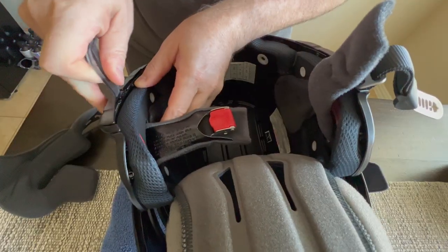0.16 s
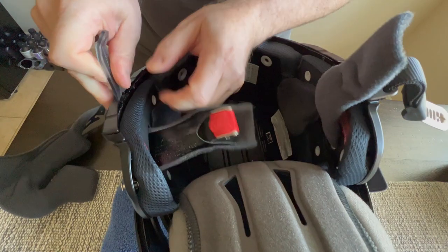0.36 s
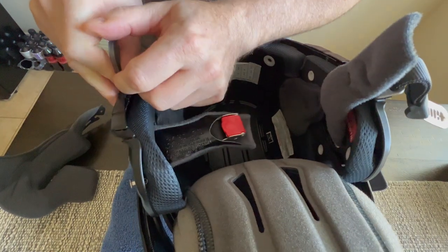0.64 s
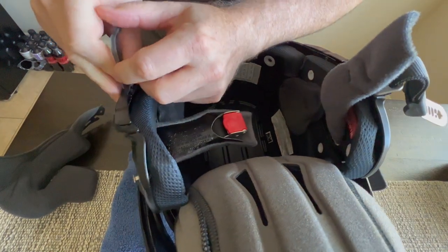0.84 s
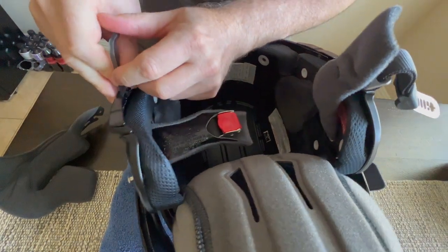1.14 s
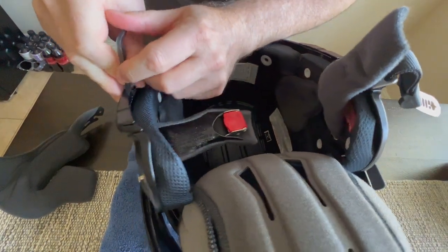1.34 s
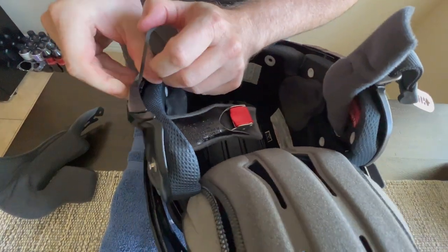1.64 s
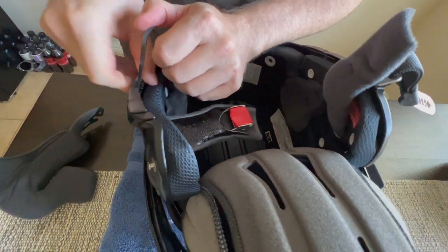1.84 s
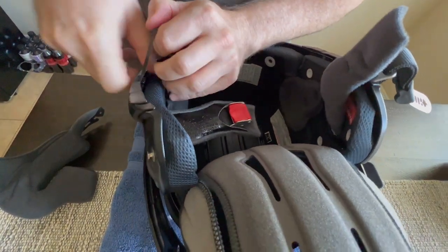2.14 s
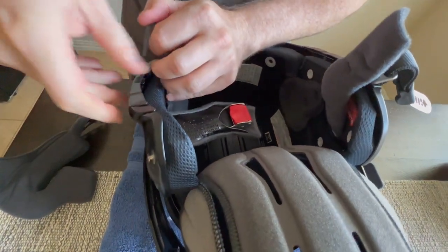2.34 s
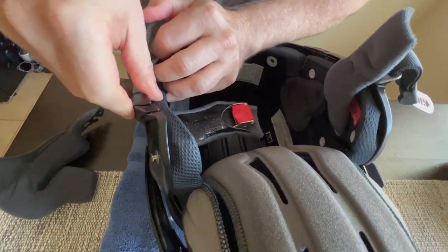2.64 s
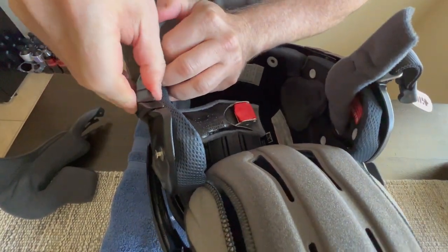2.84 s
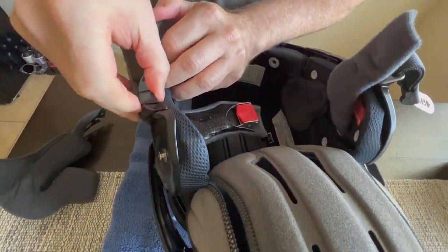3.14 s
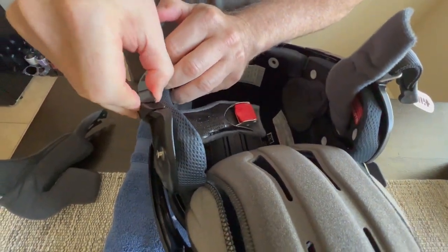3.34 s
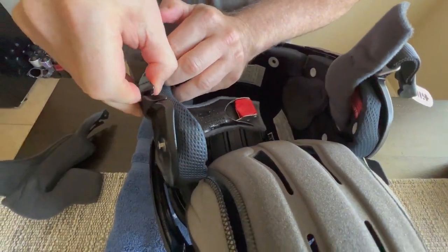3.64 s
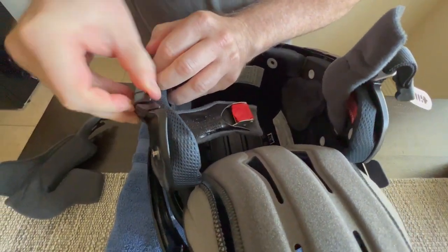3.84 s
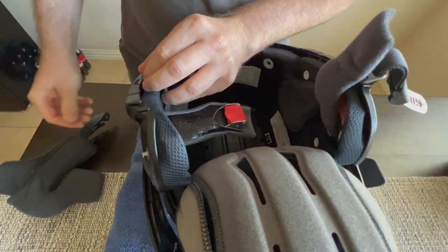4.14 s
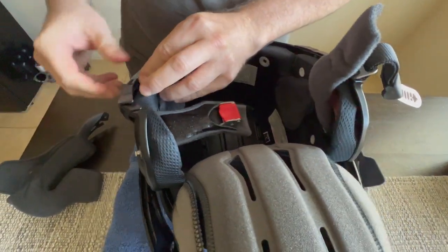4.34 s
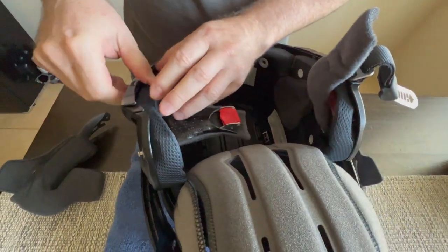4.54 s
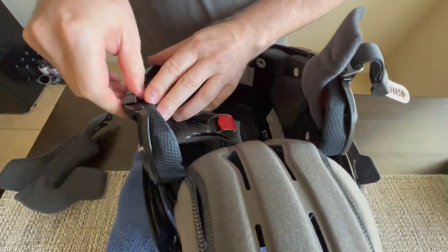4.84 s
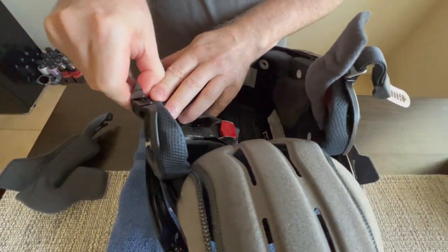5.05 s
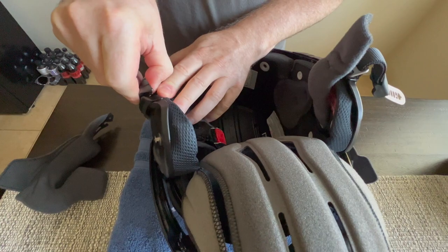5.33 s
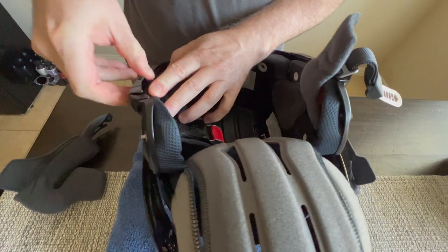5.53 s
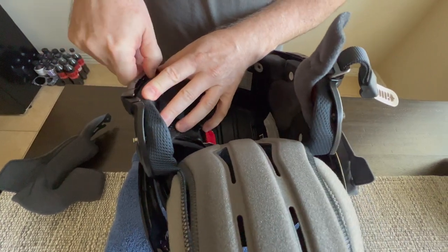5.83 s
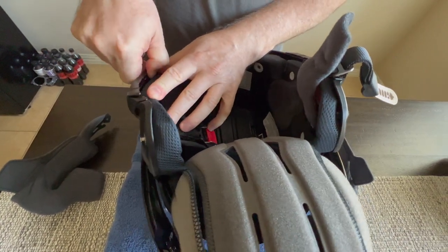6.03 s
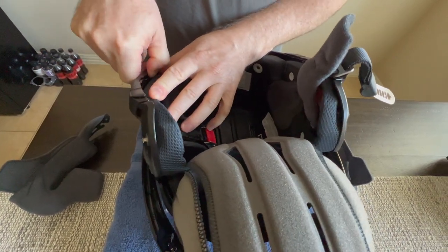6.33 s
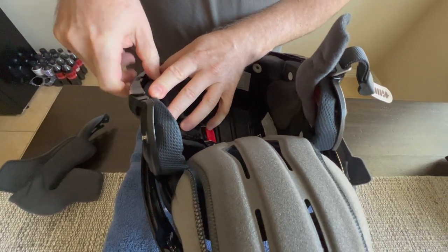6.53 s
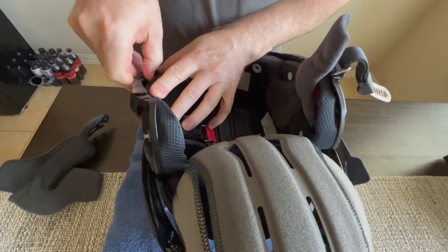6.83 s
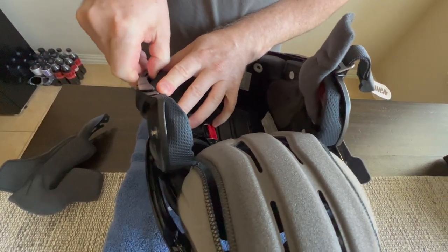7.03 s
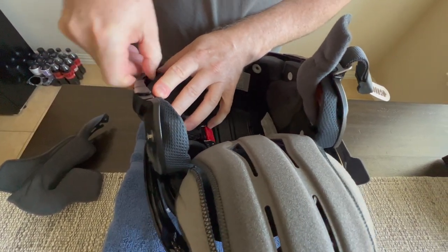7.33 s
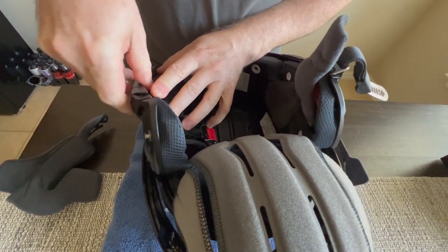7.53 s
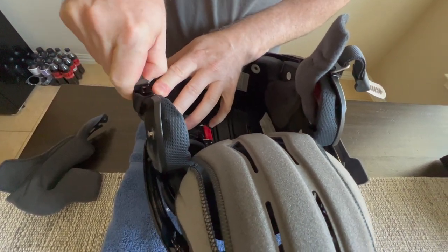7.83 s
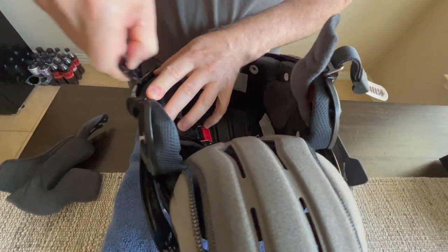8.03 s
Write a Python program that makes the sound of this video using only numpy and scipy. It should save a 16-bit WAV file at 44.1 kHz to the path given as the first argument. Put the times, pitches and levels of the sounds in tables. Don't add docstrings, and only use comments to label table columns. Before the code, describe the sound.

Close stereo pickup at a table indoors: faint padding rustle and light plastic taps, a small metal tinkle near the start, grainy rubbing. Midway the tool lets go with a hard bright snap and a run of clacks, skids and short scrapes. It calms to light clicks and rubs, before several strong, lower snaps knock the hollow shell at the end. Soft bassy room tone and a short room tail lie beneath, weighted to the left.

```python
import sys
import numpy as np
from scipy import signal
from scipy.fft import rfft, irfft, next_fast_len
from scipy.io import wavfile
from scipy.ndimage import uniform_filter1d

SR = 44100
rng = np.random.default_rng(int(sys.argv[2]) if len(sys.argv) > 2 else 0)


def gain_from_db(level_db):
    decades = np.asarray(level_db, float) / 20
    return 10 ** decades


def master_out(mix):
    frames = np.transpose(np.atleast_2d(mix))
    ceiling = np.clip(frames, -1, 1)
    pcm = np.round(ceiling * 32767).astype(np.int16)
    wavfile.write(sys.argv[1], SR, pcm)


N = 360738


def all_contacts():
    # start_s, crack_db, thud_db, knock_db, crack_hz
    snaps = [(1.1818, -40, -33.5, -39, 3000), (3.5812, -3.5, -44, -26, 11000), (3.5928, -5, -41, -40, 2700),
             (3.6033, -17.5, -39, -31.5, 3000), (3.68, -17, -37.5, -31, 3930),
             (3.7286, -21, -46, -32, 5270), (3.769, -56, -42, -53, 2700), (3.8386, -43, -45, -55, 3790),
             (3.9659, -30.5, -35, -31.5, 5270), (4.0391, -26.5, -41, -34, 6400),
             (4.058, -19.5, -51, -42, 6000), (4.2411, -63, -43.5, -53, 2700),
             (4.745, -60, -51.5, -77, 4300), (4.833, -58.5, -47.5, -52.5, 3000),
             (5.2965, -52, -42, -61, 4470), (5.4798, -42, -47, -57, 4250), (5.5003, -26, -32, -45.5, 2710),
             (5.6133, -37.5, -41.5, -44, 4620), (5.7766, -36, -49.5, -52.5, 7050),
             (6.1405, -38.5, -41, -49, 4200), (6.196, -38.5, -37, -56, 3420),
             (7.0948, -50, -45.5, -48.5, 2700), (7.5092, -58, -69, -50.5, 4510),
             (7.5199, -34.5, -34.5, -39.5, 3460), (7.6252, -19.5, -42, -30, 4550),
             (7.637, -30, -50, -54, 3900), (7.7293, -9, -31, -28.5, 4300),
             (7.7433, -13.5, -25.5, -30, 3800), (7.749, -20, -32, -36, 2600),
             (7.8703, -13.5, -21.5, -28, 3000), (7.901, -15, -29.5, -26, 4340)]
    # cavity_hz, shell_hz (centres), slip_ms, lag_ms (of the body)
    spots = [(384, 930, 1.12, 2.08), (400, 1000, 0.63, 3.2), (400, 1400, .45, 1.5), (400, 1500, 2.5, .8),
             (400, 1150, 1.1, 1.5), (500, 1070, 1.2, 1.5), (450, 820, 3.4, .5), (340, 750, 1.25, 1.53),
             (400, 1460, 0.97, 1.4), (400, 1800, 0.57, 1.3), (350, 1000, 1.6, 1.56), (380, 1200, 2.3, .5),
             (340, 700, .8, .5), (480, 630, 2, 0.4), (370, 1100, 2, 1.4), (360, 1140, 2.7, 1.6),
             (406, 1000, 0.89, 1.6), (500, 870, 1.2, 1.4), (500, 1900, 1.1, 1.47), (350, 1350, 2.2, 0.77),
             (340, 1000, 2.16, 2.54), (400, 1000, 1.16, 1.6), (360, 890, 2.1, .5), (425, 680, 1.5, 2.6),
             (400, 800, 1.33, 2.6), (400, 1000, 1.1, 1.6), (420, 1030, 1.1, 1.55), (352, 1050, 1.4, 1.55),
             (400, 1000, 1.1, 0.76), (443, 1110, 1.07, 2.5), (400, 1050, 1.93, 2.52)]
    # start_s, crack_db, thud_db, knock_db
    catches = [(.2051, -56, -80, -75), (.2998, -53, -62, -55.5), (.9294, -73, -60.5, -73),
               (2.4488, -50.5, -87, -82), (2.8554, -61, -59, -72), (2.9942, -63, -49.5, -64),
               (3.1106, -45, -46.5, -56.5), (5.1128, -60, -50, -61.5), (5.669, -46, -62.5, -72),
               (6.672, -49, -59, -54), (7.3676, -51.5, -53, -52.5)]
    # start_s, crack_db, thud_db, knock_db
    taps = [(.0138, -49, -55, -61), (.8946, -96, -63, -78), (1.0275, -62, -74, -63),
            (1.4034, -61, -58, -72), (2.1714, -38, -64, -52), (2.669, -60, -68, -63),
            (2.7328, -49.5, -69, -68), (2.7715, -47, -60, -66), (3.2241, -73, -55, -72),
            (3.2512, -70, -49, -63), (3.307, -60, -50.5, -62), (3.368, -53.5, -49.5, -65),
            (3.4124, -50, -62, -67), (3.4932, -57, -53, -70), (3.9145, -41, -54.5, -61),
            (4.7565, -43, -58, -70), (6.2679, -44, -63, -67), (6.35, -49.5, -55.5, -60.5),
            (6.4074, -58, -52.5, -63.5), (6.8493, -63, -64, -81), (7.2824, -59, -63, -58.5)]
    # start_s, crack_db, thud_db, knock_db
    slips = [(.2504, -48, -60, -54), (.3049, -48, -52, -70), (.3202, -47, -59, -62), (.358, -70, -60, -71),
             (.7435, -56, -61, -66.5), (1.3646, -56.5, -55, -59.5), (1.4816, -70, -66, -64),
             (1.5346, -45.5, -56, -63), (2.3823, -54, -58, -72), (2.5057, -44.5, -55, -66),
             (2.9347, -51, -48.5, -63.5), (3.2884, -58.5, -63, -63.5), (5.033, -41, -69.5, -74.5),
             (6.7173, -54.5, -51, -60), (6.9487, -46.5, -77, -60.5), (7.011, -45, -62.5, -62),
             (7.0836, -39.5, -60.5, -59.5), (7.3004, -54, -49.5, -56)]
    usual_spot = 410, 1050, 1.5
    cavity_hz, shell_hz, lag_ms = usual_spot
    rows = [(*snap, *spot) for snap, spot in zip(snaps, spots)]
    for kind, crack_hz, slip_ms in (catches, 4470, 1.85), (taps, 2700, 1), (slips, 2560, 2.68):
        rows += [(*touch, crack_hz, cavity_hz, shell_hz, slip_ms, lag_ms) for touch in kind]
    return sorted(rows)


def contacts():
    # pitch_hz, level_db, t60_s
    cavity = [(60.3, -10, .09), (124, -4.5, 0.05), (230, -9, 0.024), (301, -8.5, 0.039),
              (362.3, 1.5, 0.046), (450, -2, 0.033), (520, -7.5, 0.025), (665, -2, 0.025)]
    # pitch_hz, level_db, t60_s
    shell = [(683, -4.5, 0.033), (852, -5, 0.018), (940, -6.5, 0.03), (1016, 1, 0.033), (1169, 0.5, 0.025),
             (1300, -2, .025), (1447, -4, 0.013), (1554, -3, 0.018), (1750, -4, 0.026), (2074, 3.5, 0.016)]
    cavity_focus_db, shell_focus_db = 9, 11.5
    out, t = np.zeros((3, N)), np.arange(SR // 12) / SR
    for start_s, crack_db, thud_db, knock_db, crack_hz, cavity_hz, shell_hz, slip_ms, lag_ms in all_contacts():
        slip_s, lag_s = np.clip(slip_ms, .2, 15) / 1000, max(lag_ms, 0) / 1000
        u = t / (1.18 * slip_s)
        swell = (u * np.exp(1 - u)) ** 2
        trail = gain_from_db(-20.0 - 60 * t / 0.05) * np.minimum(u, 1)
        slip = rng.standard_normal(len(t)) * (swell + trail)
        slip = np.array([slip, slip, t == 0])

        bright = gain_from_db(-8 + 7.5 * np.log2(crack_hz / 4000))
        crack = resonate(slip, crack_hz, 0.51 * crack_hz) * 2.0 + bright * resonate(slip, 8300, 11000)
        thud = strike(cavity, t, 1.5, .022, 1.6 * slip_s, cavity_hz, cavity_focus_db, 1.5)
        knock = strike(shell, t, 2.5, .015, 1.2 * slip_s, shell_hz, shell_focus_db, 3.0)
        thud = np.array([*thud, thud[0] * gain_from_db(-60 * t / .02)])
        knock = np.array([*knock, knock[0] * gain_from_db(-60 * t / .007)])

        parts = ((crack, crack_db - 0.5, 0), (thud, thud_db + 7, lag_s), (knock, knock_db + 12, .6 * lag_s))
        for part, level_db, late_s in parts:
            near = gain_from_db(level_db) * peak_one(part[:2])
            walls = rms_one(part[2]) * near.std()
            add(out, np.array([*near, walls]), start_s - .001 + late_s)
    out = signal.sosfilt(signal.butter(2, 50, "high", fs=SR, output="sos"), out)
    return out[:2], out[2]


def strike(modes, t, spread_db, detune, rise_s, centre_hz, focus_db, sides_db):
    hz, level_db, t60_s = np.transpose(modes)[:, :, None]
    luck = rng.standard_normal((4, len(modes), 1))
    off_centre = np.minimum(np.log2(hz / centre_hz) ** 2, 1)
    level_db = level_db + spread_db * luck[0] - focus_db * off_centre
    tones = np.sin(2 * np.pi * hz * (1 + detune * luck[1]) * t + .5 * luck[2])
    rings = gain_from_db(level_db) * np.exp(-np.log(1000) * t / t60_s) * tones
    lean = gain_from_db(sides_db * luck[3].T * [[1], [-1]])
    return lean @ rings * (1 - np.exp(-(t / rise_s) ** 2))


def rubbing():
    # peak_s, rise_s, fall_s, padding_db, scrape_db
    rubs = [(.06, 0.15, 0.094, -64, -68), (.26, 0.062, 0.081, -59.5, -56.5), (.38, 0.082, 0.18, -64, -60.5),
            (1.034, 0.055, 0.085, -68, -71.5), (1.44, 0.08, .03, -66, -83),
            (1.552, 0.057, 0.094, -57.5, -56), (1.738, 0.035, 0.08, -63.5, -59.5),
            (1.9, 0.18, 0.36, -57, -55.5), (2.12, .06, 0.13, -54.5, -52.5),
            (2.18, 0.017, 0.036, -49.5, -48), (2.55, 0.082, .1, -57.5, -60),
            (2.634, 0.053, 0.017, -67, -62.5), (2.784, 0.093, 0.011, -59.5, -60),
            (4.4, 0.73, 0.52, -63.5, -62.5), (4.754, 0.31, 0.022, -71, -58), (4.9, 0.044, 0.22, -63, -68),
            (5.14, 0.047, 0.073, -59.5, -74.5), (5.304, 0.1, 0.053, -62.5, -75.5),
            (5.62, 0.11, 0.22, -60.5, -60), (5.78, 0.044, 0.068, -49, -50), (5.96, 0.44, .06, -63, -69),
            (6.76, 0.082, 0.043, -61, -63.5), (7.308, 0.046, 0.15, -60.5, -76),
            (7.86, 0.06, 0.084, -53, -50)]
    # start_s, fall_s, padding_db, scrape_db
    skid_rows = [(0.509, 0.022, -55.5, -68), (0.743, .05, -75, -89), (.93, 0.18, -88, -76),
                 (1.366, 0.17, -78, -72), (2.379, 0.016, -67, -61.5), (2.864, 0.031, -76, -65),
                 (2.934, 0.23, -71, -64.5), (3.114, 0.071, -84, -62.5), (3.612, 0.18, -47, -31.5),
                 (3.738, 0.028, -59, -38.5), (3.77, 0.016, -37.5, -52), (3.797, 0.18, -49, -47),
                 (3.979, 0.058, -39.5, -74), (4.062, 0.087, -42, -31), (4.132, 0.16, -47, -37),
                 (4.658, 0.17, -64, -47), (5.032, 0.064, -63.5, -71.5), (5.52, 0.039, -47, -48),
                 (6.22, 0.037, -61, -68), (6.266, 0.058, -62, -80), (6.348, 0.11, -67.5, -62.5),
                 (6.476, 0.069, -68, -62), (6.674, 0.17, -65, -67.5), (6.854, 0.14, -70.5, -78.5),
                 (7.12, 0.065, -61, -64.5), (7.368, 0.054, -65.5, -59.5), (7.757, 0.0097, -32.5, -33),
                 (7.78, 0.16, -54, -51), (7.924, 0.06, -45, -39), (7.969, 0.21, -48.5, -49.5)]
    # peak_s, rise_s, fall_s, level_db
    drags = [
        (1.75, 0.066, 0.023, -67),
        (1.92, 0.11, 0.033, -56.5),
        (2.125, 0.047, 0.09, -59.5),
        (2.195, 0.11, 0.014, -63),
    ]
    # pitch_hz, width_hz, level_db
    padding_peaks = [(368, 66, 4), (667, 37, 1.5), (965, 230, 1), (1458, 1090, -2), (1925, 680, -3.5)]
    # pitch_hz, width_hz, level_db
    scrape_peaks = [(2060, 1700, 1.5), (2800, 1600, 2.5), (3800, 430, -1.5), (4470, 1300, -2),
                    (5220, 830, 0), (6280, 900, -3.5), (8000, 1400, -6.5), (9320, 1100, -3.5),
                    (11500, 2500, -12.5), (14800, 2300, -15)]
    # pitch_hz, width_hz, level_db
    edge_peaks = [
        (2850, 200, 0),
        (4250, 250, -11),
        (4900, 250, -10),
    ]
    skid_rise_s, skid_shape, rub_shape = 0.024, 1.1, 1.07
    skids = [(start_s, skid_rise_s, *rest) for start_s, *rest in skid_rows]
    soft, hard = np.sqrt(strokes(rubs, rub_shape) + strokes(skids, skid_shape))
    fine = grains(5000, 3.3, 2.5)
    padding = soft * body(grains(4000, 2.0, 2.0), padding_peaks, 1.3)
    scrape = hard * body(fine, scrape_peaks, 1.2)
    rasp = np.sqrt(strokes(drags, rub_shape)[0]) * body(fine, edge_peaks, 1.0)
    return gain_from_db(2.5) * padding + gain_from_db(-3.5) * scrape + gain_from_db(4.5) * rasp


def strokes(rows, shape):
    t, power = np.arange(N) / SR, np.zeros((len(rows[0]) - 3, N))
    for peak_s, rise_s, fall_s, *levels_db in rows:
        near = slice(max(int((peak_s - 3 * rise_s) * SR), 0), int((peak_s + 3 * fall_s) * SR))
        away = np.where(t[near] < peak_s, (peak_s - t[near]) / rise_s, (t[near] - peak_s) / fall_s)
        power[:, near] += gain_from_db(np.array(levels_db)[:, None] - 20 * away ** shape) ** 2
    return power


def grains(per_s, size_db, flicker_db):
    born = rng.random(N) < per_s / SR
    sizes = gain_from_db(size_db * np.minimum(rng.exponential(1, N), 4)) * rng.choice([-1, 1], N)
    return born * sizes * drift(21, flicker_db) + 1e-18


def body(x, peaks, wander_db):
    out = 0
    for k, (hz, width_hz, level_db) in enumerate(peaks):
        gain = (-1) ** k * gain_from_db(level_db) * drift(6.8, wander_db)
        out = out + gain * resonate(x, hz, width_hz)
    return rms_one(out)


def squeaks():
    # start_s, length_s, pitch_hz, width_hz, level_db
    bursts = [(2.847, 0.04, 4300, 700, -69.5), (3.119, 0.038, 4300, 800, -66.5),
              (3.562, 0.018, 1700, 149.2, -55), (3.963, .07, 5830, 150, -58),
              (3.971, 0.065, 1230, 597, -38), (4.046, .065, 1340, 600, -39.5), (4.09, .12, 1490, 1300, -44),
              (3.975, .12, 200, 220, -53.5), (4.08, .12, 187, 200, -56), (4.2, .1, 1300, 900, -53),
              (4.207, .012, 400, 200, -50), (4.645, .025, 3900, 4470, -44.5), (4.64, .032, 1357, 910, -54),
              (4.672, .035, 2930, 604, -58), (4.726, .008, 4300, 700, -57),
              (4.754, 0.011, 3000, 900, -50.5), (4.765, .008, 2980, 600, -62), (4.83, .006, 4200, 600, -62),
              (4.838, .032, 520, 400, -56), (5.475, .01, 4330, 900, -55.5),
              (5.537, .014, 3280, 1800, -54.5), (6.142, .024, 450, 400, -52), (7.368, .03, 4400, 3480, -65),
              (7.878, .02, 500, 500, -35), (7.91, .03, 1100, 500, -37)]
    out, friction = np.zeros(N), iter(np.array_split(grains(5000, 2.8, 1.5), 60))
    for start_s, length_s, hz, width_hz, level_db in bursts:
        u = np.arange(0, 1, 1 / (length_s * SR))
        hiss = resonate(resonate(next(friction), hz, width_hz), hz, width_hz)[-len(u):]
        swell = np.abs(np.sin(np.pi * u ** 0.83)) ** 0.47
        add(out, gain_from_db(level_db) * rms_one(hiss) * swell, start_s)
    return out


def buckle():
    # start_s, peak_db
    touches = [
        (0.3461, -62),
        (0.399, -40.5),
        (0.4213, -29),
        (0.491, -25),
        (0.6094, -74),
    ]
    # pitch_hz, level_db, t60_s
    metal = [(5890, -17, .05), (6010, -15, .06), (6250, -19, .03), (7380, -11, .03), (7900, -4, .025),
             (8460, -9, .03), (8730, -2, .045), (11300, -9, .02), (12500, -9, .02), (14870, -3, .03),
             (15200, -6, .02)]
    out, t = np.zeros(N), np.arange(SR // 8) / SR
    for start_s, peak_db in touches:
        tick = resonate(rng.standard_normal(len(t)) * gain_from_db(-60 * t / 0.086), 10900, 8800)
        rings = strike(metal, t, 2.0, .002, .0008, 9000, 0, 0)[0]
        add(out, gain_from_db(peak_db - 5.0) * (rings + gain_from_db(-9.5) * tick), start_s)
    return out


def ports(x):
    # pitch_hz, balance_db
    balance = [(40, 3.5), (100, 3), (500, 2.1), (1400, 5.5), (2800, 7.5), (5500, 15.5), (9000, -4),
               (15000, 1.5)]
    # left_ms, left_db, right_ms, right_db
    table_echoes = [
        (1.42, -20, 1.2, -14.5),
        (3.55, -13, 3.75, -6),
        (5.298, -20.5, 5.1, -10),
    ]
    lead_samples = 12
    size = next_fast_len(N + 4096)
    hz = np.arange(size // 2 + 1) * SR / size
    shade = gain_from_db(at_hz(balance, hz) / 2)
    left = right = 1
    for left_ms, left_db, right_ms, right_db in table_echoes:
        left = left + gain_from_db(left_db) * np.exp(-2j * np.pi * hz * left_ms / 1000)
        right = right + gain_from_db(right_db) * np.exp(-2j * np.pi * hz * right_ms / 1000)
    lag = np.exp(-2j * np.pi * hz * lead_samples / SR)
    return irfft(rfft(x, size) * np.array([shade * left, lag * right / shade]), size)[:, :N]


def room(x):
    # pitch_hz, t60_s, level_db
    decay = np.array([(99, 0.34, -0.5), (398.6, 0.2, -12.5), (1300, 0.36, -11.5), (2120, .34, -3.5),
                      (3900, 0.29, -5.5), (8500, .33, -3.5), (14000, 0.15, -21)])
    t = np.arange(SR * 3 // 5) / SR

    def fade(hz):
        t60_s = at_hz(decay, hz)
        return gain_from_db(at_hz(decay[:, ::2], hz) - 60 * t / t60_s) / np.sqrt(SR * t60_s / 14)

    tail = bands(len(t), fade) * (1 - np.exp(-(t / .007) ** 2))
    return signal.fftconvolve(x[None], tail, axes=1)[:, :N]


def rumble():
    # pitch_hz, level_db (per Hz)
    spectrum = [(13, -41), (22, -9.5), (155, 4), (291, -5.5), (370, -7), (753, -16.5), (1010, -18),
                (1900, -25), (5030, -30.5), (8980, -35), (10200, -35.5), (12000, -47.5), (15600, -69.5),
                (22000, -120)]
    noise = bands(N, lambda hz: gain_from_db(at_hz(spectrum, hz)) * drift(0.58, 2.0))
    return gain_from_db(-65.5 + 2.0) * rms_one(noise)


def bands(length, gain):
    # pitch_hz, likeness (0-1)
    likeness = [(60, .75), (300, .72), (640, .35), (1400, .05), (15000, 0)]
    out, edges = 0, 22 * 2 ** np.arange(0, 9.6, .5)
    white = rng.standard_normal((2, 2, length)).astype(np.float32)
    for k, (low, high) in enumerate(zip(edges, edges[1:])):
        band = signal.butter(2, [low, high], "band", fs=SR, output="sos")
        mid, side = signal.sosfilt(band, white[k % 2])
        hz = np.sqrt(low * high)
        alike = np.clip(at_hz(likeness, hz), -1, 1)
        out = out + gain(hz) * (np.sqrt(1 + alike) * mid + np.sqrt(1 - alike) * side * [[1], [-1]])
    return out


def drift(rate_hz, depth_db):
    r = np.exp(-128 * np.pi * rate_hz / SR)
    slow = signal.lfilter([1], [1, -2 * r, r * r], rng.standard_normal(N // 64 + 2002))[2000:]
    return uniform_filter1d(np.repeat(gain_from_db(depth_db * rms_one(slow)), 64)[:N], size=64)


def resonate(x, hz, width_hz):
    r = np.exp(-np.pi * width_hz / SR)
    poles = [1, -2 * r * np.cos(2 * np.pi * hz / SR), r * r]
    return signal.lfilter(np.array([1, 0, -1]) * (1 - r * r) / 2, poles, x)


def at_hz(points, hz):
    points_hz, values = np.array(points)[:, 0], np.array(points)[:, 1]
    return np.interp(np.log(np.maximum(hz, 1)), np.log(np.maximum(points_hz, 1)), values)


def rms_one(x):
    return x / np.sqrt(np.mean(x ** 2) + 1e-20)


def peak_one(x):
    return x / np.abs(x).max()


def add(out, sound, start_s):
    i = round(start_s * SR)
    out[..., i:i + sound.shape[-1]] += sound[..., :N - i]


def scene():
    hits, spread = contacts()
    tinkles, rubs, hisses = buckle(), rubbing(), squeaks()
    echoes = room(spread + rubs + gain_from_db(-4) * hisses + gain_from_db(-10) * tinkles)
    air = rumble()
    lean = gain_from_db(np.array([[1.6], [-1.6]]))
    return ports(hits + tinkles + rubs + hisses) + (echoes + air) * lean


def band_limit(x):
    return signal.sosfilt(signal.butter(12, 16890, fs=SR, output="sos"), x)


def record(dry):
    # pitch_hz, width_hz, depth (0-1)
    dips = [
        (10250, 1500, .93),
        (13800, 1600, .95),
    ]
    mix = dry
    for hz, width_hz, depth in dips:
        mix = mix - np.clip(depth, 0, 1) * resonate(mix, hz, width_hz)
    mix = signal.sosfilt(signal.cheby2(12, 70, 16900, fs=SR, output="sos"), mix)
    return band_limit(mix)


dry = scene()
out = record(dry)
master_out(out)
```